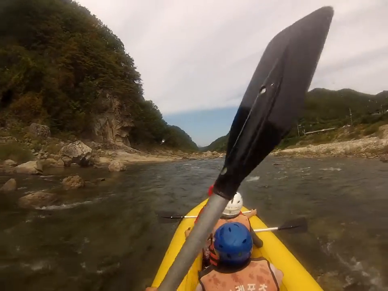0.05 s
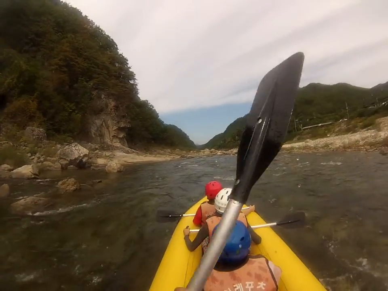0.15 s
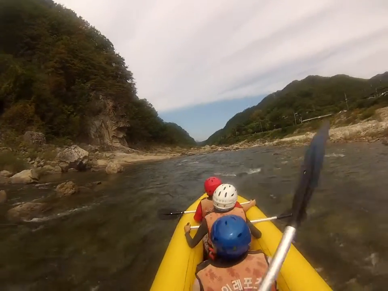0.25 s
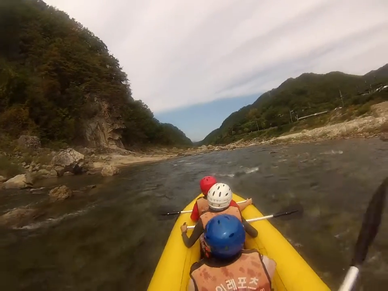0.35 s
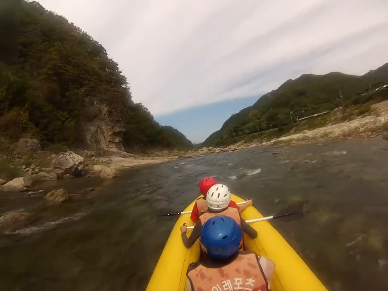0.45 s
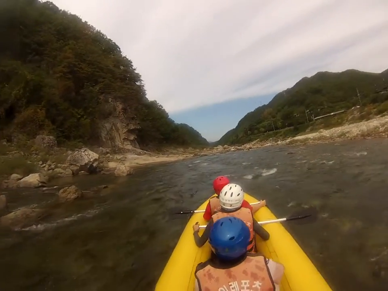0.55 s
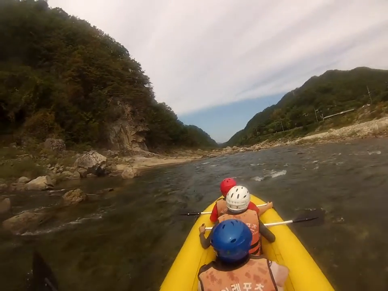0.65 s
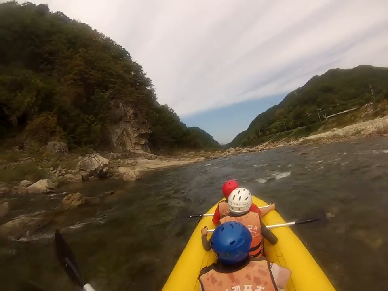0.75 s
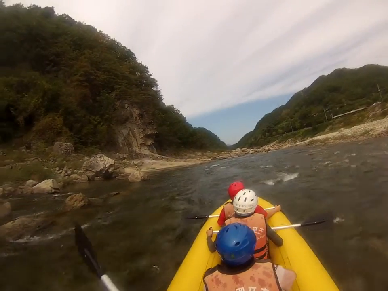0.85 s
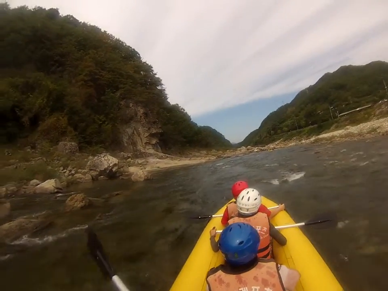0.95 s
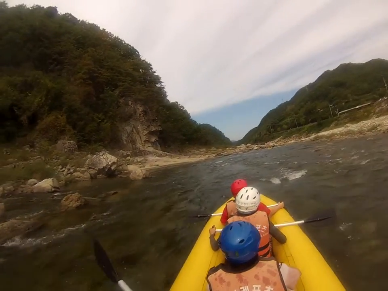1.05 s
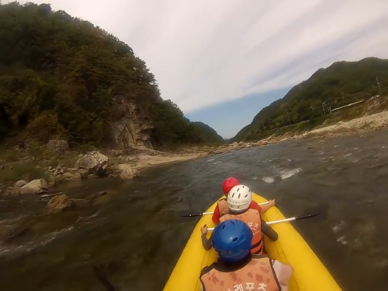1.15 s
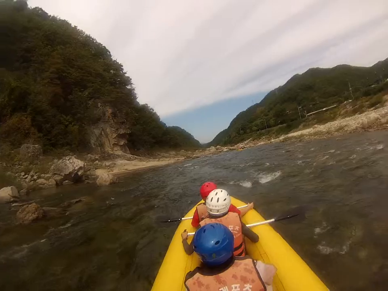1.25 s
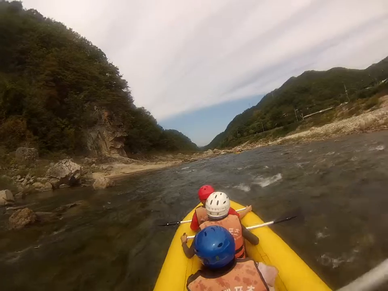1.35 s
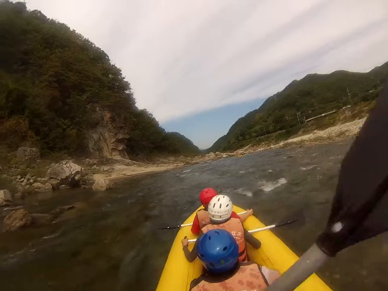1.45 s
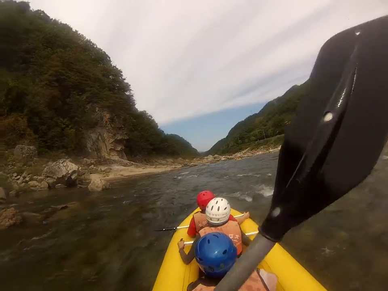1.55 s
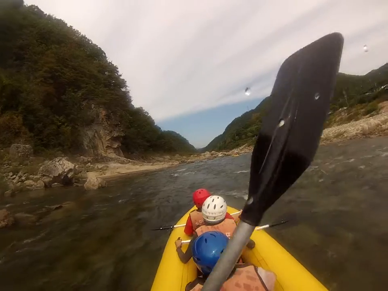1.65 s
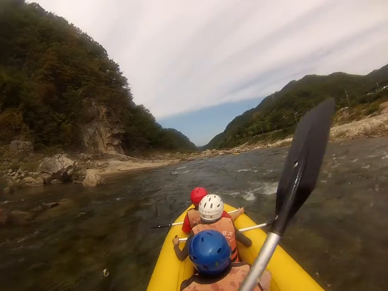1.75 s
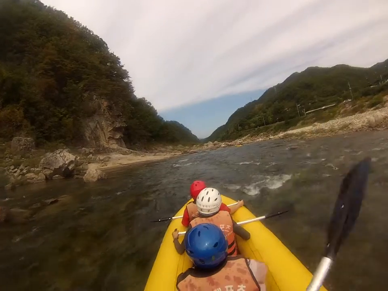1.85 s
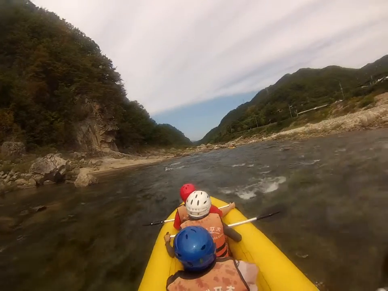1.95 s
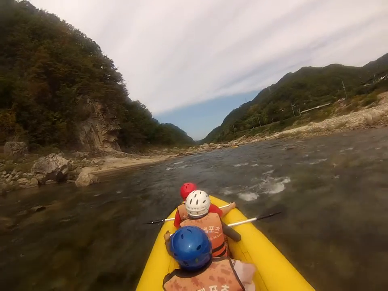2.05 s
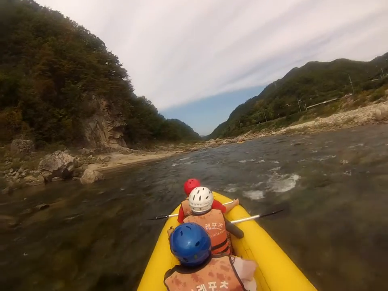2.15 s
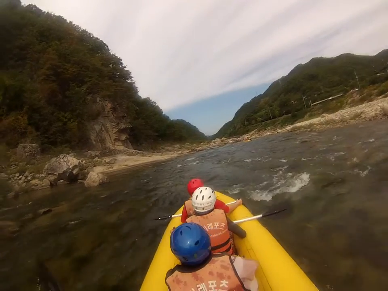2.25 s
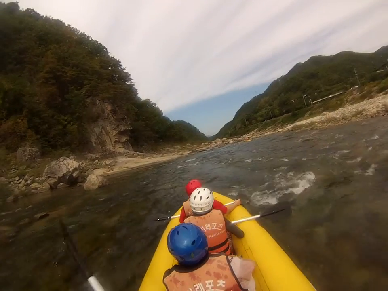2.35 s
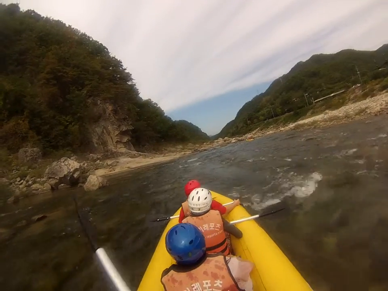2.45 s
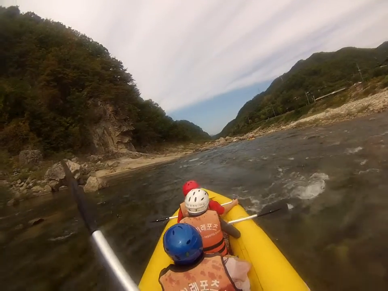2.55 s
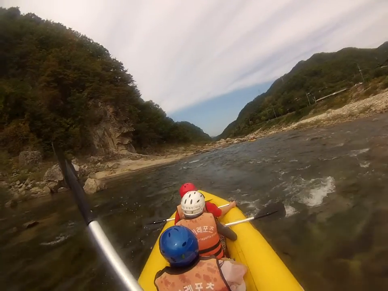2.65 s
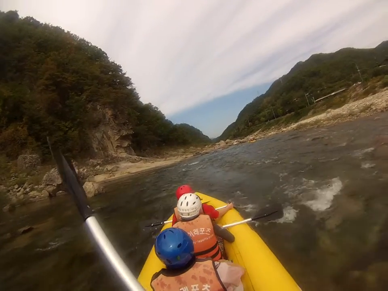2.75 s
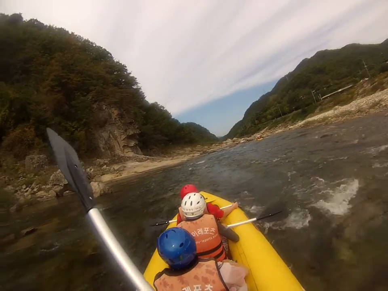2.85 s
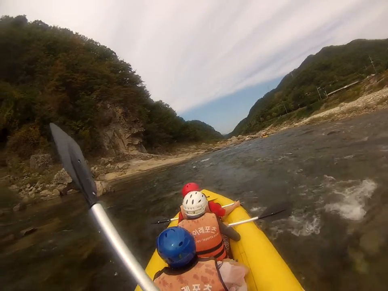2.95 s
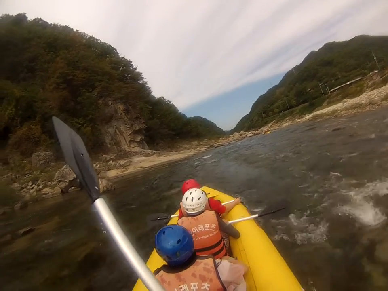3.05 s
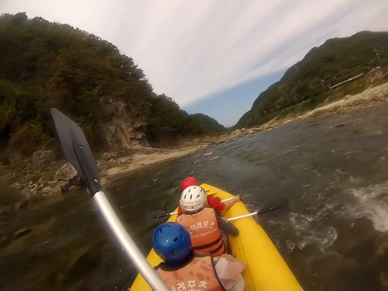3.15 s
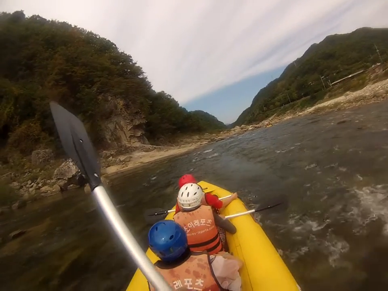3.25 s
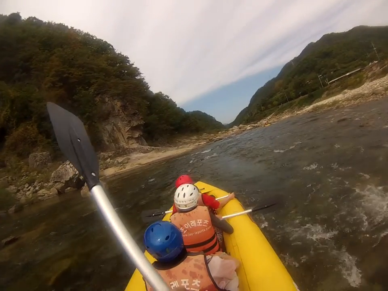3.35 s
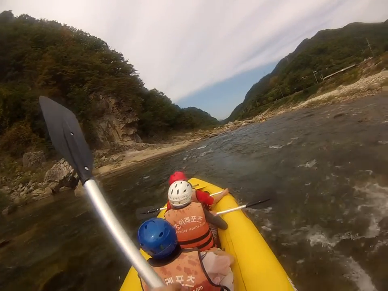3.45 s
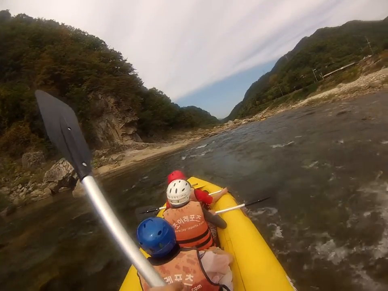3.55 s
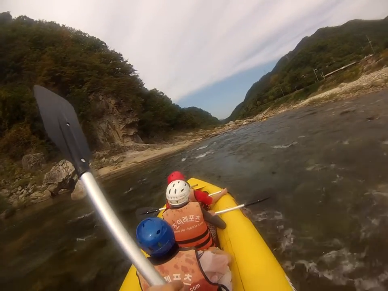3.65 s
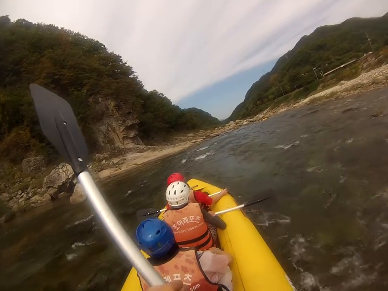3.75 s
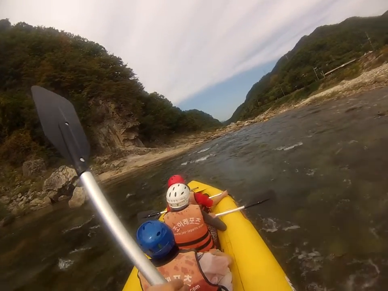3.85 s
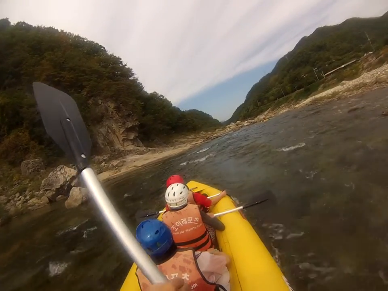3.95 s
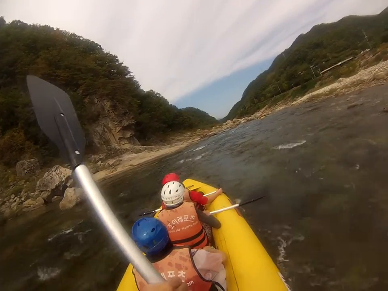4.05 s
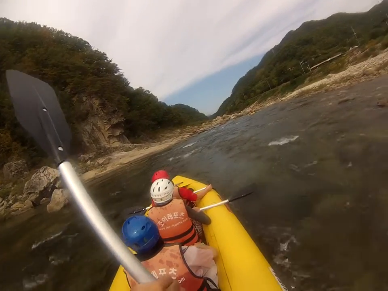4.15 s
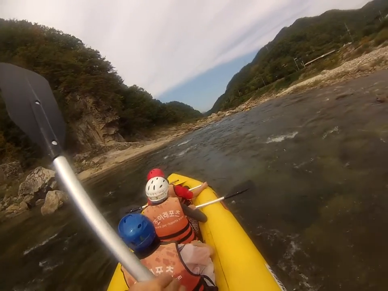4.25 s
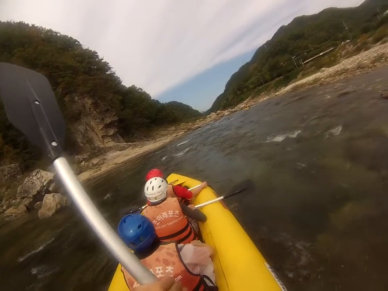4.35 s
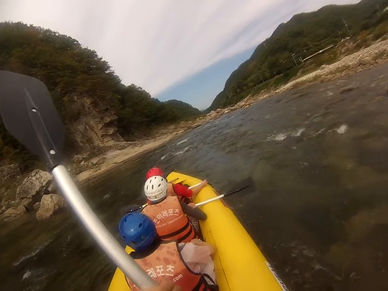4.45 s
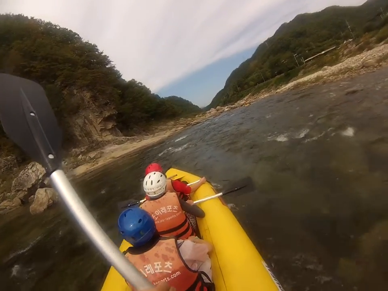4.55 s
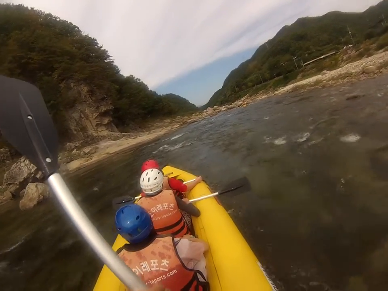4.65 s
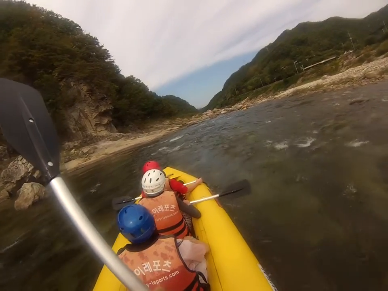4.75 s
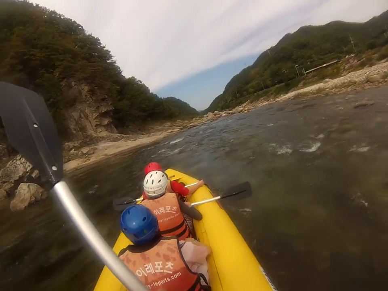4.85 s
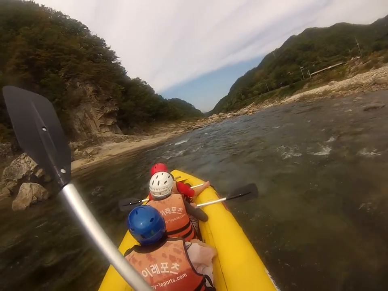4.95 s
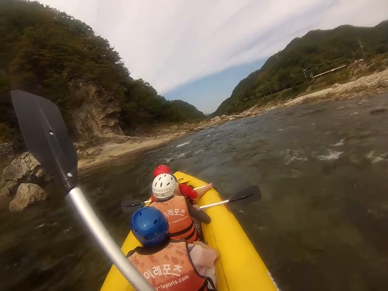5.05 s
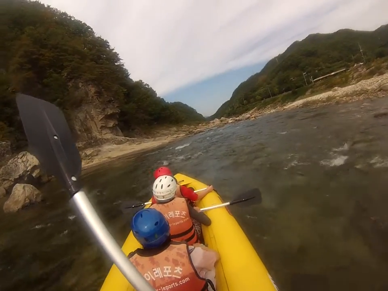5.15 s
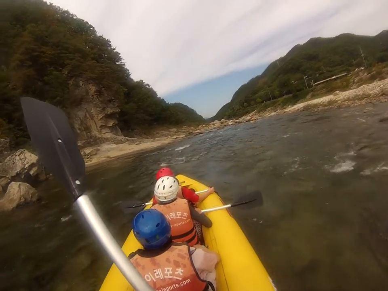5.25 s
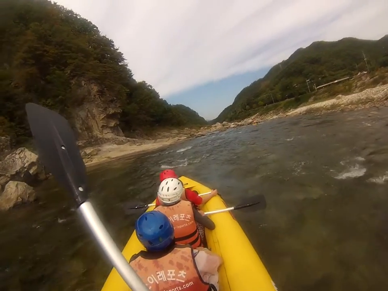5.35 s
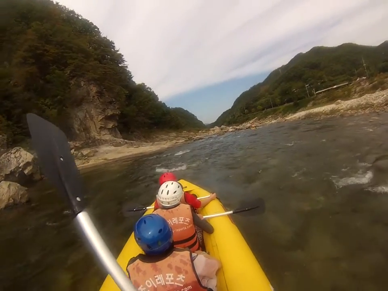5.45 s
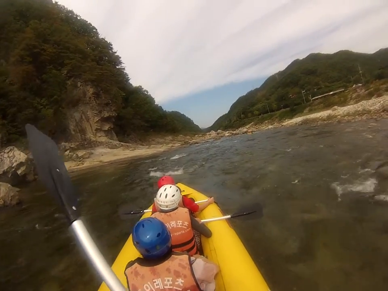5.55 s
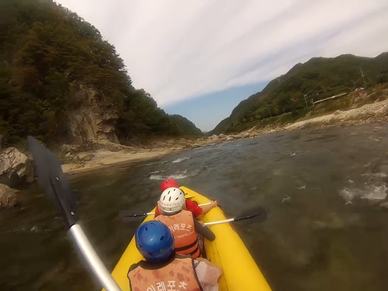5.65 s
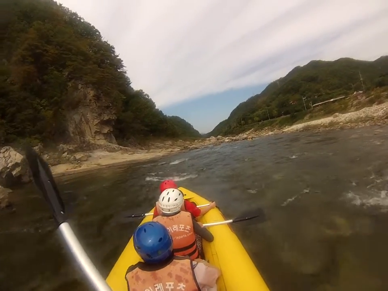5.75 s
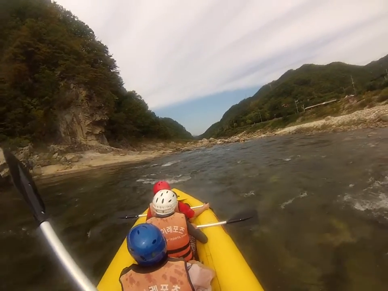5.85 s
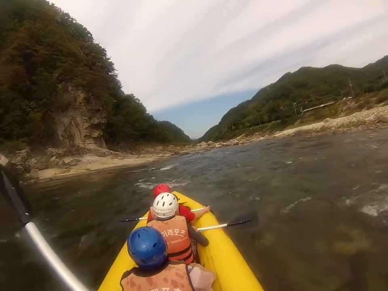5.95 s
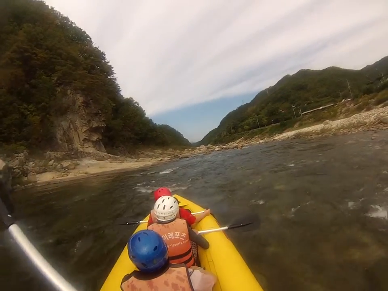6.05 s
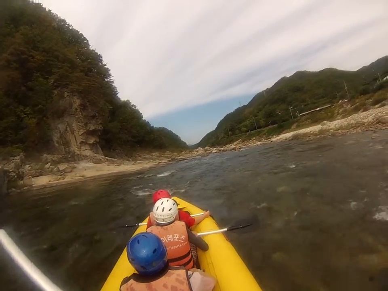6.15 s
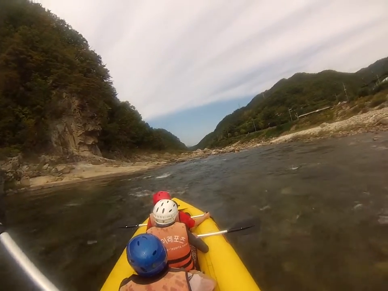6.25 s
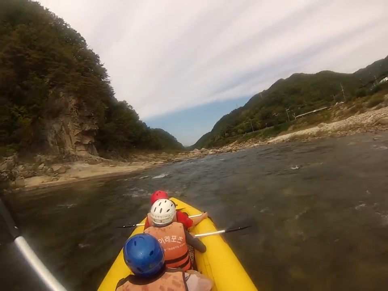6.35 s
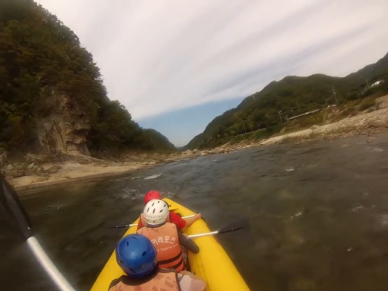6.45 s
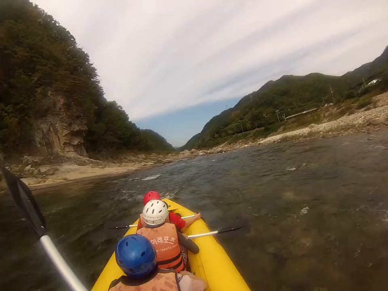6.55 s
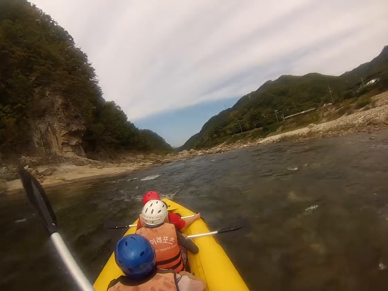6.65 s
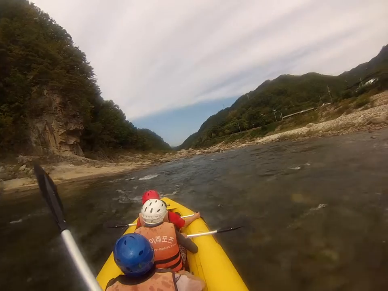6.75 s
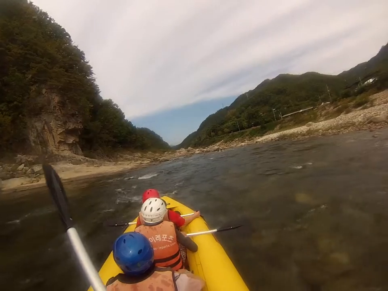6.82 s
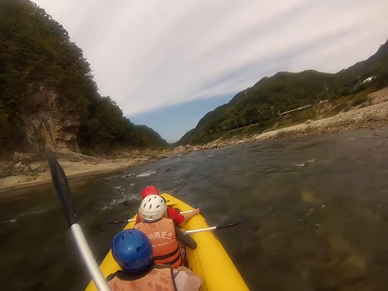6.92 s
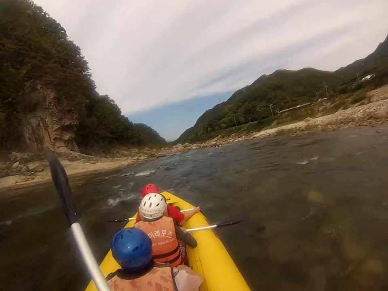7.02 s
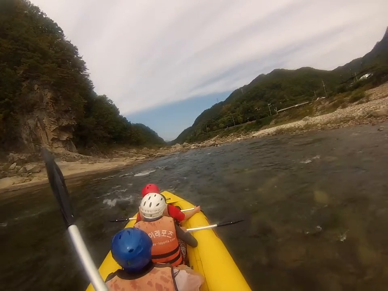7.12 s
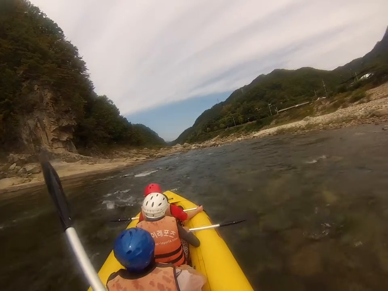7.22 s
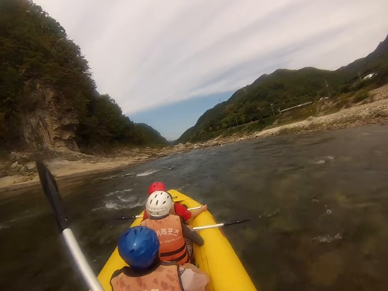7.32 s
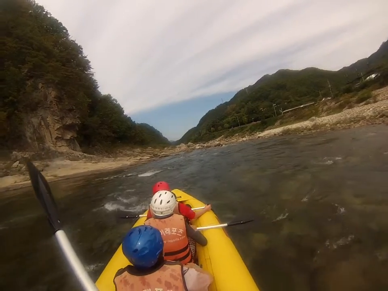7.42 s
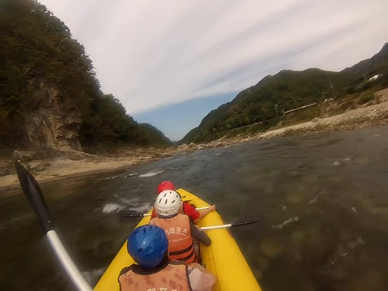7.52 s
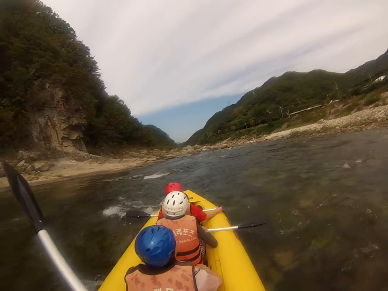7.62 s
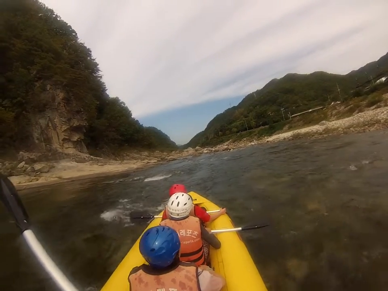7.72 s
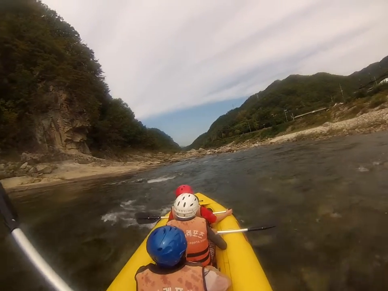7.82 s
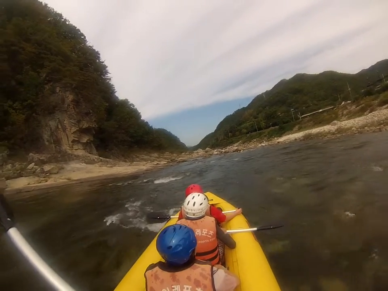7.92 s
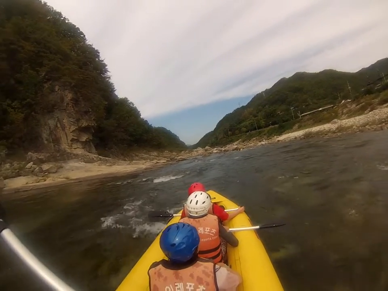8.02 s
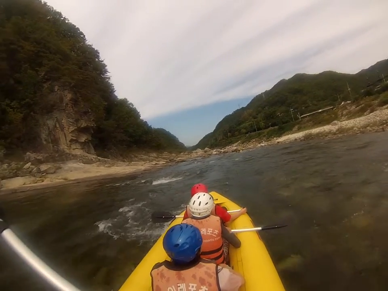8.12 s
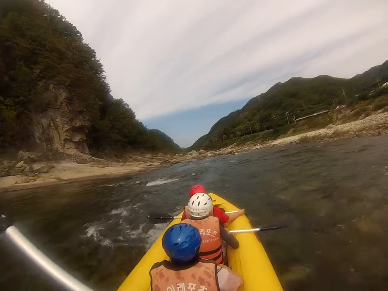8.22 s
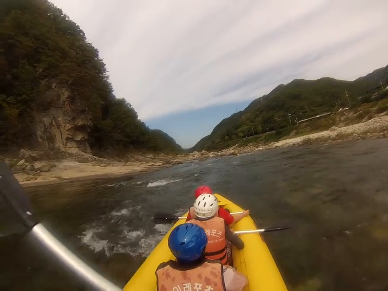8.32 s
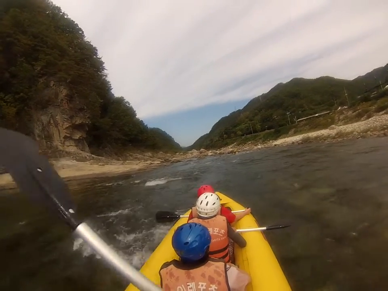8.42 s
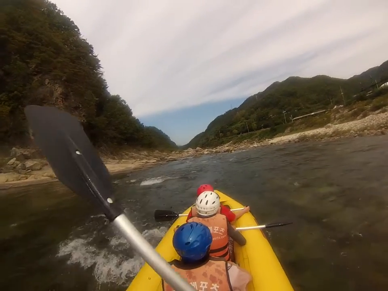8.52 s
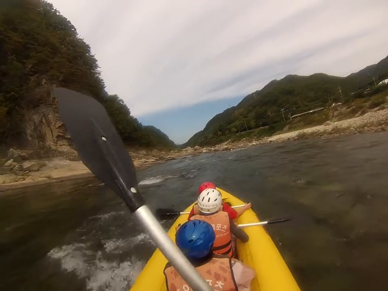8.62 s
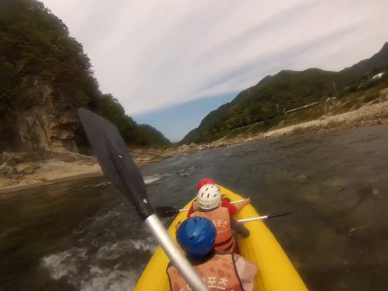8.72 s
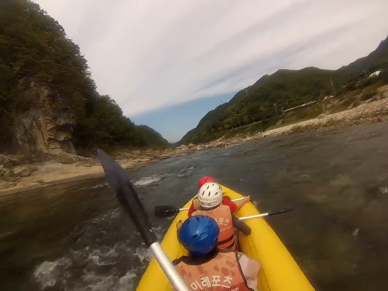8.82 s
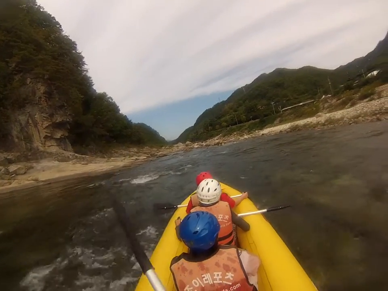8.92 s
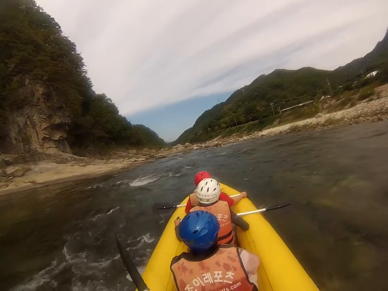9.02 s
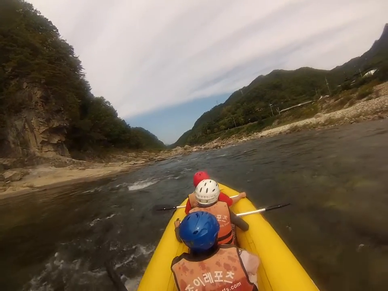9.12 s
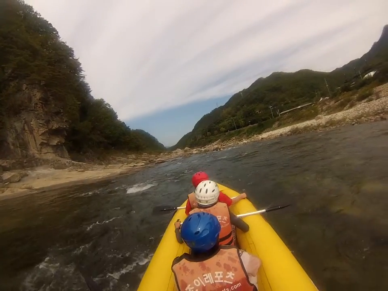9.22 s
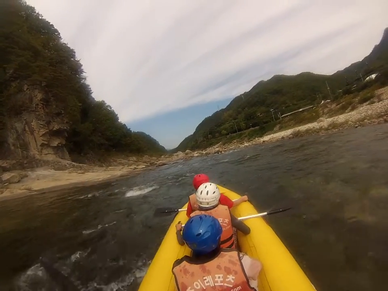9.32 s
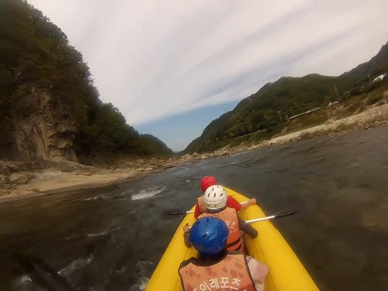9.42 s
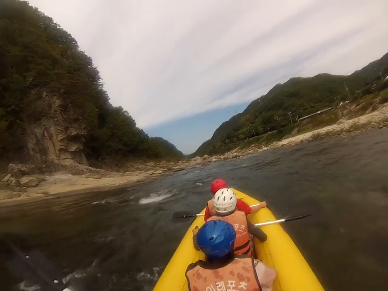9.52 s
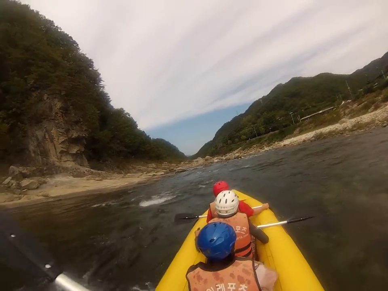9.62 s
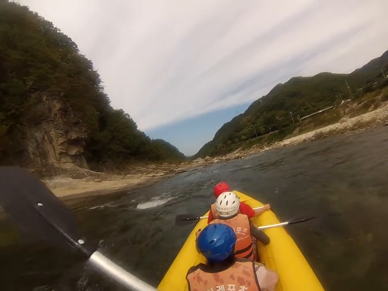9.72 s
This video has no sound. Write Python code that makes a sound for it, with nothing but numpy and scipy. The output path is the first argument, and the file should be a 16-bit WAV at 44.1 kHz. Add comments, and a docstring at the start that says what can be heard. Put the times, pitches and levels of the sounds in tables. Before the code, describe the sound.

Boxy, muffled rushing water with plopping drops and low wind buffeting, rising to a bubbly swell mid-way, plus soft rubber thumps early on.

```python
"""Bubble clouds of shallow rapids gurgle and fizz round an inflatable boat, heard from inside a waterproof case.
They are banded noise plus ringing bubbles, swelling as a breaking wave slides past; the case rings hollow and boxy.
Single drops plop as rising sine blips and flung water splats as bursts of banded noise.
The rubber hull thumps as ringing modes and is rubbed with a falling, jittery tone.
Gusts buffet the case: shaped noise in a low rumble and a higher flutter."""
import sys
import numpy as np
from scipy import signal
from scipy.fft import rfft, irfft, next_fast_len
from scipy.io import wavfile
from scipy.ndimage import uniform_filter1d

SR = 44100
rng = np.random.default_rng(int(sys.argv[2]) if len(sys.argv) > 2 else 0)


def wav_out(sig):
    """Save sig, one row per channel (or a flat mono array), as 16-bit PCM at SR to the path in sys.argv[1]."""
    wavfile.write(sys.argv[1], SR, np.round(np.clip(np.atleast_2d(sig).T, -1, 1) * 32767).astype(np.int16))


N = 431298
TIME = np.arange(N) / SR
SIZE = 2 * next_fast_len(N // 2 + SR // 4)   # transform length, with room for filter tails
HZ = np.maximum(np.arange(SIZE // 2 + 1) * SR / SIZE, 1)


def from_db(db):
    """Decibels to gain."""
    return 10 ** (np.asarray(db) / 20)


def rms_one(x):
    """Scale to unit power."""
    return x / np.sqrt(np.mean(x ** 2) + 1e-20)


def in_time(rows):
    """Join up each column of a curve table, sample by sample."""
    times, *columns = np.transpose(rows)
    return [np.interp(TIME, times, column) for column in columns]


def spectrum_db(points):
    """Join up a short spectrum on a log-frequency axis."""
    hz, db = np.transpose(points)
    return np.interp(np.log(HZ), np.log(hz), db)


def colour(x, gain):
    """Filter by a gain per frequency, then scale to unit power."""
    return rms_one(irfft(rfft(x, SIZE) * gain, SIZE)[:N])


def drift(rate_hz):
    """Random movement of spread 1, smoothed above a corner rate."""
    return colour(rng.standard_normal(N), (HZ > 1) / (1 + (HZ / rate_hz) ** 2))


def swell(middle_s, length_s):
    """A smooth rise and fall of height 1, half as high at the ends of its length."""
    return 2 ** -np.minimum((2 * (TIME - middle_s) / length_s) ** 2, 20)


def ring(clicks, hz, t60):
    """A two-pole resonator: each unit click starts a dying sine of starting height 1."""
    decay = from_db(-60 / (t60 * SR))
    turn = 2 * np.pi * hz / SR
    poles = [1, -2 * decay * np.cos(turn), decay ** 2]
    return signal.lfilter([0, np.sin(turn)], poles, clicks + 1e-18)


def add(out, start_s, sound):
    """Mix a short sound in at its start time."""
    at = int(start_s * SR)
    out[at:at + len(sound)] += sound[:N - at]


def burst(attack_s, t60):
    """A quick attack and a dying tail, of height 1."""
    t = TIME[:SR // 5]
    shape = (1 - np.exp(-t / attack_s)) ** 2 * from_db(-60 * t / t60)
    return shape / shape.max()


def fizz(low_hz, high_hz):
    """Countless tiny bubbles as a moment of noise between two pitches, at unit power."""
    band = signal.butter(4, [low_hz, high_hz], "band", fs=SR, output="sos")
    return rms_one(signal.sosfilt(band, rng.standard_normal(SR // 5)))


def eddies(spectrum, even_s):
    """Turbulent pressure as coloured noise, its own loudness evened out for gusts to shape."""
    swirl = colour(rng.standard_normal(N), from_db(spectrum_db(spectrum)))
    span = max(int(even_s * SR / 2), 1)
    power = uniform_filter1d(uniform_filter1d(swirl ** 2, span), span)
    return swirl / np.sqrt(power + 1e-6)


def wind(unsteady_db=0.22, fade_db_per_s=0.4):
    """Big eddies rock the case, smaller ones flutter round its edges; gusts move both levels."""
    # spectra of the two kinds of eddy: (frequency [Hz], relative density [dB])
    buffet_spectrum = [(4, -9), (11, 0), (17, -1), (24, -14), (34, -15.5), (45, -19), (58, -27), (80, -36),
                       (160, -85)]
    flutter_spectrum = [(30, -25), (48, -3.5), (58, -1.5), (76, -0.5), (100, -8), (130, -12), (170, -14),
                        (220, -24), (500, -41), (2000, -86)]
    # gusts and lulls: (middle [s], length [s], buffet change [dB], flutter change [dB])
    gusts = [(0.107, 0.11, 7, 6), (0.294, 0.32, 12, 3.5), (0.547, 0.14, 10.5, -4), (0.85, 0.24, -1.5, -3),
             (1.22, 0.083, 11, -2), (1.422, 0.18, 0.5, -0.5), (1.658, 0.21, 9.5, 1.5),
             (1.908, 0.29, 14, -2), (2.177, 0.11, 10.5, -3), (2.368, 0.15, 7.5, 0), (2.713, 0.44, 3, 0),
             (3.033, 0.2, 0.5, 0), (3.458, 0.23, 6, 1), (3.84, 0.14, 1.5, 0), (4.24, 0.12, 2.5, -2),
             (4.735, 0.3, 6, 0.5), (6.176, 0.075, 7, 0), (6.438, 0.05, 9, 1), (6.677, 0.34, -1, -2),
             (6.98, 0.25, 2, -0.5), (7.45, 0.58, -7, 0.5), (7.773, 0.096, 2.5, 1), (8.5, 0.51, 4.5, 1),
             (8.823, 0.23, 11, 7.5), (9.002, 0.13, 14.5, 1), (9.183, 0.083, 11, 2), (9.76, 0.21, -7, 6.5)]
    breeze_db = unsteady_db * drift(2.2) - fade_db_per_s * TIME
    buffet_db = -42 + breeze_db + sum(db * swell(s, length_s) for s, length_s, db, _ in gusts)
    flutter_db = -57.5 + breeze_db + sum(db * swell(s, length_s) for s, length_s, _, db in gusts)
    buffet = from_db(buffet_db) * eddies(buffet_spectrum, even_s=0.15)
    flutter = from_db(flutter_db) * eddies(flutter_spectrum, even_s=0.25)
    return buffet + flutter


def rub(overtone_db=-21, jitter=0.038, scuff_db=-17, scuff_hz=(200, 520)):
    """Wet rubber sticks and slips: a short falling grunt with jittery pitch, over a soft scuff."""
    # the grunt: (time [s], pitch before jitter [Hz], level [dB])
    grunt = [(.452, 210, -60), (.470, 185, -42), (.485, 163, -42), (.503, 148, -40), (.516, 120, -52)]
    pitch_hz, level_db = in_time(grunt)
    phase = 2 * np.pi * np.cumsum(pitch_hz * (1 + jitter * drift(60))) / SR
    overtones = sum(np.sin(k * phase) * 2 / k for k in range(2, 5))
    band = signal.butter(2, scuff_hz, "band", fs=SR, output="sos")
    scuff = rms_one(signal.sosfilt(band, rng.standard_normal(N)))
    touching = (TIME > grunt[0][0]) * (TIME < grunt[-1][0])
    rubber = np.sin(phase) + from_db(overtone_db) * overtones + from_db(scuff_db) * scuff
    return from_db(level_db) * touching * rubber


def thumps():
    """Soft blows set the hull's air tube booming; the softer the contact, the duller the boom."""
    # blows on the hull: (time [s], strength [dB], contact cut-off [Hz])
    blows = [(1.221, -33, 32), (1.863, -31.5, 169), (8.993, -56, 89)]
    # modes of the air tube: (frequency [Hz], relative level [dB], t60 [s])
    modes = [(88, 0.5, 0.18), (120, -3, 0.086), (248, -3.5, 0.079)]
    out = np.zeros(N)
    for s, db, contact_hz in blows:
        contact = signal.butter(2, contact_hz, fs=SR, output="sos")
        push = signal.sosfilt(contact, signal.unit_impulse(SR // 2))
        boom = sum(from_db(mode_db) * ring(push, hz, t60) for hz, mode_db, t60 in modes)
        add(out, s, from_db(db) * boom)
    return out


def splats(attack_share=0.088):
    """Flung water lands in a short burst of fizz; the longer ones also start more softly."""
    # landings: (time [s], lowest frequency [Hz], highest frequency [Hz], level [dB], t60 [s])
    landings = [(1.135, 5000, 5770, -55, 0.022), (2.071, 4700, 6340, -57, .018),
                (2.257, 4800, 6200, -65, .05), (2.931, 3200, 6400, -62, .04), (2.985, 3000, 5800, -64, .06),
                (3.861, 3000, 5100, -60, .045), (3.953, 2900, 3600, -57, 0.026),
                (4.292, 2900, 5370, -60, 0.066), (4.564, 2400, 5700, -60, .045),
                (4.583, 9500, 11200, -56, .012), (4.802, 5100, 6500, -58, .012),
                (5.139, 4500, 11500, -59, .018), (6.127, 2900, 3600, -61, .03),
                (7.249, 3000, 3600, -65, 0.034), (8.292, 6000, 8000, -62, .02),
                (8.375, 2050, 2760, -61, .25), (8.435, 3400, 7400, -65, 0.045),
                (8.807, 6600, 7400, -67, .03), (9.013, 3230, 5700, -61, 0.047),
                (9.062, 3200, 3800, -62, .025), (9.165, 2060, 2480, -58, .25),
                (9.368, 6000, 9800, -62, .025), (9.389, 7500, 10000, -63, .03),
                (9.707, 4600, 6900, -62, .025)]
    out = np.zeros(N)
    for s, low_hz, high_hz, db, t60 in landings:
        add(out, s, from_db(db) * burst(attack_share * t60, t60) * fizz(low_hz, high_hz))
    return out


def drops(attack_s=0.00094, rise=0.022, spatter=0.15):
    """A drop traps a bubble that rings and rises in pitch, with a little spatter."""
    # single drops and gulps: (time [s], starting pitch [Hz], tone level [dB], t60 [s])
    plops = [(0.52, 1335, -43.5, 0.034), (.997, 1210, -45, .025), (1.782, 1210, -44.5, .025),
             (2.066, 1220, -44.5, .03), (2.391, 1570, -44, .025), (2.713, 2250, -36.5, 0.034),
             (3.077, 2300, -40, 0.017), (3.378, 372, -51, 0.047), (3.407, 2200, -42, .025),
             (3.738, 1094, -43.5, 0.048), (4.261, 2280, -40, .025), (4.302, 476, -55, 0.05),
             (4.343, 2300, -43, 0.04), (4.832, 2230, -44, .025), (5.066, 423, -52, 0.054),
             (5.141, 2340, -42, .025), (5.460, 1670, -44, .03), (5.587, 2230, -43, 0.046),
             (5.853, 2270, -47, .025), (5.948, 1330, -46, .03), (7.111, 2260, -49, 0.03),
             (7.265, 1530, -51, .04), (7.385, 1460, -49, .04), (8.370, 378, -55, .078),
             (8.765, 2340, -44.5, 0.027), (8.990, 418, -53, 0.037), (9.139, 353, -53, 0.22),
             (9.250, 616, -58, 0.09), (9.255, 309, -54, 0.11), (9.302, 1520, -47, .04),
             (9.385, 2220, -49, 0.023)]
    out, t = np.zeros(N), TIME[:SR // 5]
    for s, hz, db, t60 in plops:
        tone = np.sin(2 * np.pi * hz * t * (1 + rise * t / t60 / 2))   # pitch climbs by rise per t60
        plop = tone + spatter * fizz(hz * 0.77, hz * 1.15)
        add(out, s, from_db(db) * burst(attack_s, t60) * plop)
    return out


def case_gain(side):
    """What the case lets through: its wall and resonances, for water ahead (0) to the side (1)."""
    # water through the case wall: (frequency [Hz], relative gain [dB])
    wall = [(150, 3), (350, 1), (500, 1.5), (750, 0), (950, 0), (1400, 7), (1900, -0.5), (2500, -1),
            (3100, -5.5), (3900, -12), (7000, -15), (9000, -17.5), (12000, -21), (15300, -25)]
    # resonances by where the water lies: (centre [Hz], width [Hz], boost from ahead [dB], from the side [dB])
    resonances = [(325, 67, 2, 3), (872, 61, 2, 4), (1115, 150, 2, 7), (1183, 270, 7, 2),
                  (1520, 118, 5, 5.5), (1670, 170, 5.5, 7.5), (2107, 128, 7, 1), (2271, 234, 5.5, 13.5),
                  (2690, 310, 3.5, 1), (3320, 250, 1.5, 5.5), (3615, 110, 4.5, 4.5), (4300, 200, -1, 6.5),
                  (5700, 170, 0.5, 5.5), (6700, 220, 3, 1.5), (7650, 310, 1.5, 6), (10000, 1200, -1.5, 4)]
    gain_db = spectrum_db(wall)
    for hz, width_hz, ahead_db, side_db in resonances:
        peak_db = ahead_db + side * (side_db - ahead_db)
        gain_db = gain_db + peak_db * 2 ** -np.minimum((2 * (HZ - hz) / width_hz) ** 2, 20)
    return from_db(gain_db)


def laps(per_s, rise_s=0.002, fall_s=0.0082):
    """Little crests tip over at random: quick rise, slower fall, height 1 before centring on zero."""
    t = TIME[:SR // 5]
    shape = (1 - np.exp(-t / rise_s)) * np.exp(-t / fall_s)
    tips = (rng.random(N) < per_s / SR).astype(float)
    crests = signal.fftconvolve(tips, shape / shape.max())[:N]
    return crests - crests.mean()


def bubbles(low_hz, high_hz, per_s, cycles, spread_db, count=28):
    """Bubbles are born at random and ring briefly, each dealt a strength and one of count pitches."""
    born = np.flatnonzero(rng.random(N) < per_s / SR)
    strength_db = spread_db * np.minimum(rng.exponential(1, len(born)), 4.5)
    strengths = from_db(strength_db) * rng.choice([-1, 1], len(born))
    dealt, out = rng.integers(0, count, len(born)), np.zeros(N)
    for k, hz in enumerate(np.geomspace(low_hz, high_hz, count)):
        clicks = np.bincount(born, strengths * (dealt == k), N)
        out += hz * ring(clicks, hz, cycles / hz)   # higher pitches start louder
    return out


def river(surge_db=0.07, patchy_db=0.5, clump_db=2.5, wander=0.13):
    """Clouds of far roar and clumped near bubbles follow the white water, heard through the case."""
    # gurgle, rush, splash, spray: (lowest [Hz], highest [Hz], near bubbles before clumping [1/s],
    # cycles rung to -60 dB, strength spread [dB], near power share [0-1], calm level before the case's
    # unit-power colouring is mixed [dB], gain per white water [dB/dB], per slosh [dB/dB], per crest [dB])
    clouds = [(182, 993, 170, 13.5, 3, 0.21, -64, 0.24, 0.86, 1.5),
              (949, 1935, 500, 35, 2, 0.37, -58.5, 0.5861, 1.2, 1),
              (1898, 3825, 450, 37, 2, 0.3, -62, 0.9138, 1.85, 2.5),
              (3650, 19300, 1100, 8, 3.5, 0.19, -68.5, 0.45, 0.74, 1)]
    # the breaking wave passes the boat's side: (time [s], share from the side before wander [0-1])
    side_pass = [(2.5, 0.2), (3.0, 1), (4.7, 0.8), (5.8, 0.2)]
    # white water swelling as the wave passes: (time [s], level above calm, scaled per cloud [dB])
    white_water = [(0.0, 1), (0.8, 4), (1.4, 2.5), (2.82, 5.5), (3.0, 8), (3.85, 11), (4.35, 10),
                   (4.8, 7.5), (5.25, 6), (6.4, 0.5), (8.1, 1), (8.9, 2.5), (9.78, 2.5)]
    # wavelets and paddle wash slosh or ebb, scaled per cloud:
    # (middle [s], length [s], change of the lower three clouds [dB], change of the spray [dB])
    sloshes = [(0.537, 0.11, 1.5, 1), (0.746, 0.1, 0, 0.5), (2.1, 0.17, 0.5, 0), (2.35, 0.18, 0, 3),
               (2.81, 0.072, 0, -1), (2.967, 0.1, 2, 2), (3.35, 0.12, 2, 2), (4.275, 0.1, 0.5, 1.5),
               (5.052, 0.097, 1, -0.5), (8.442, 0.17, 1, 2), (8.63, 0.055, -0.5, 0.5), (8.78, 0.17, 1, 3),
               (9.02, 0.06, 1.5, 0), (9.19, 0.07, 1, 0.5), (9.375, 0.15, 2.5, 4), (9.4, 0.09, 0.5, 2)]
    ahead, side = case_gain(0), case_gain(0.76)
    (beside,), (white_db,) = in_time(side_pass), in_time(white_water)
    beside = np.clip(beside + wander * drift(2.8), 0, 1)   # the loudest water shifts about
    slosh_db = sum(db * swell(s, length_s) for s, length_s, db, _ in sloshes)
    spray_db = sum(db * swell(s, length_s) for s, length_s, _, db in sloshes)
    surge, out = drift(13), np.zeros(N)   # one wavelet stirs every cloud
    crests = laps(4.3 * from_db(white_db))   # 4.3 per s in calm water, more in white water
    for cloud_row, wash_db in zip(clouds, [slosh_db] * 3 + [spray_db]):
        low_hz, high_hz, per_s, cycles, spread_db, share, calm_db, with_white, with_slosh, crest_db = cloud_row
        band = 1 / np.sqrt((1 + (low_hz / HZ) ** 20) * (1 + (HZ / high_hz) ** 20))
        clumps = from_db(clump_db * (surge + drift(20)) / np.sqrt(2))
        near = colour(bubbles(low_hz, high_hz, per_s * clumps, cycles, spread_db), band)
        far = colour(rng.standard_normal(N), band)
        cloud = np.sqrt(share) * near + np.sqrt(1 - share) * far
        heard = (1 - beside) * colour(cloud, ahead) + beside * colour(cloud, side)
        level_db = calm_db + with_white * white_db + with_slosh * wash_db + crest_db * crests
        out += heard * from_db(level_db + surge_db * surge + patchy_db * drift(30))
    return out


def scene():
    """All sources summed in open air, without echo, into one channel."""
    return (river() + wind() + drops() + splats() + thumps() + rub())[None]


def record(dry):
    """A steep low-pass cuts the top above 15350 Hz."""
    return signal.sosfilt(signal.ellip(12, .1, 80, 15350, fs=SR, output="sos"), dry)


dry = scene()
out = record(dry)
wav_out(out)
```